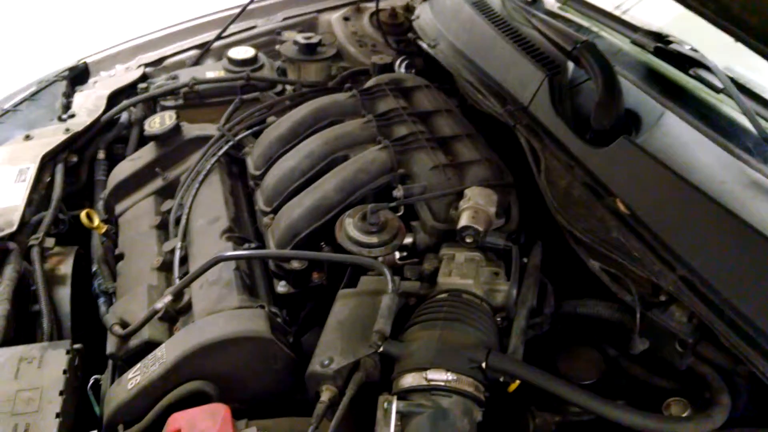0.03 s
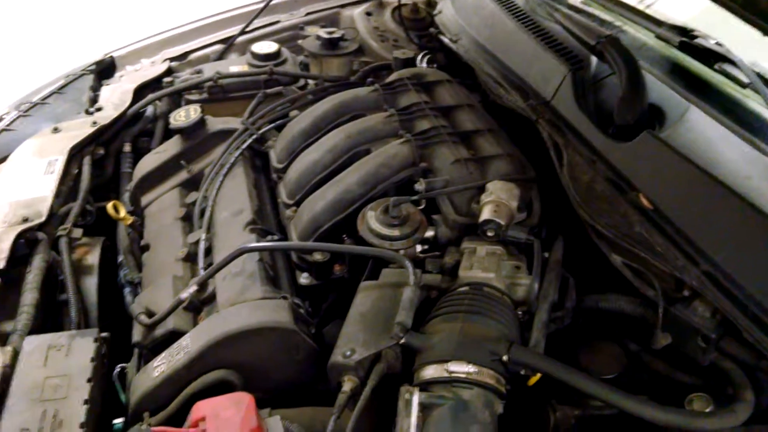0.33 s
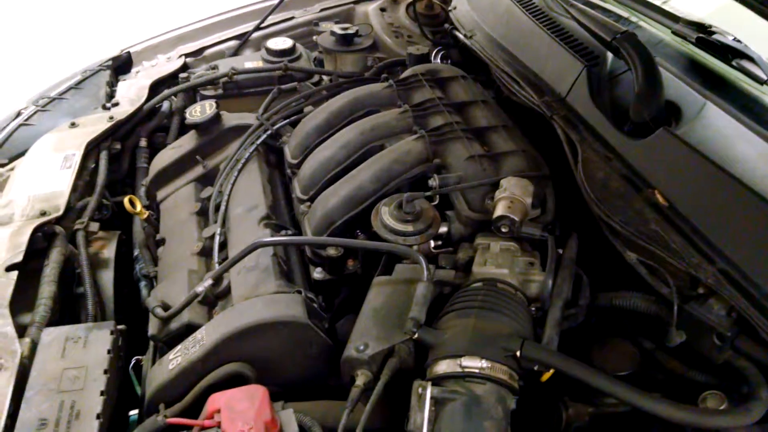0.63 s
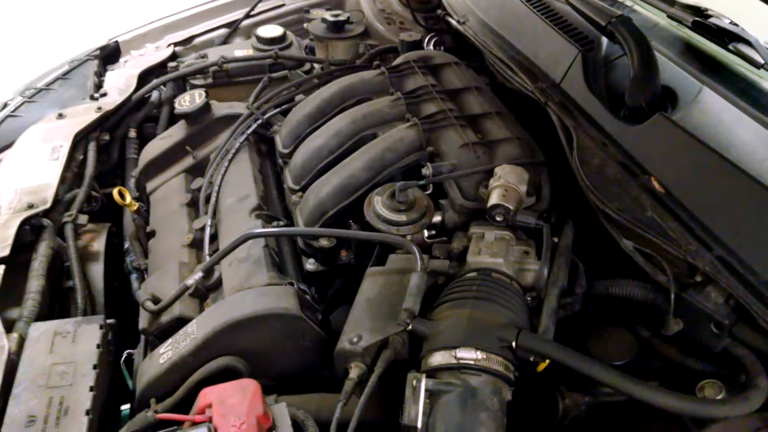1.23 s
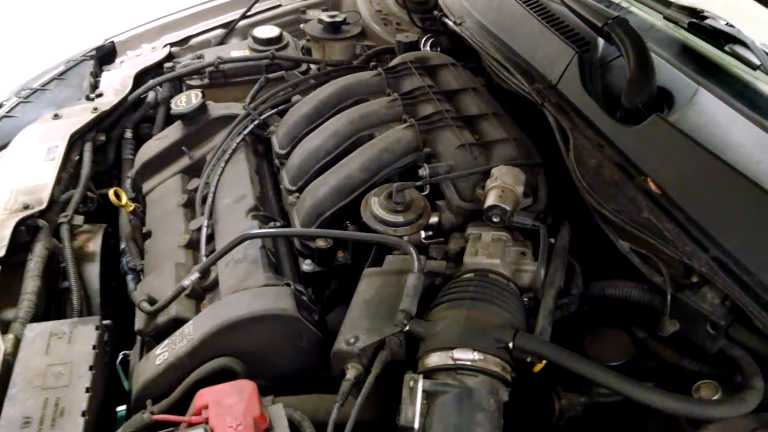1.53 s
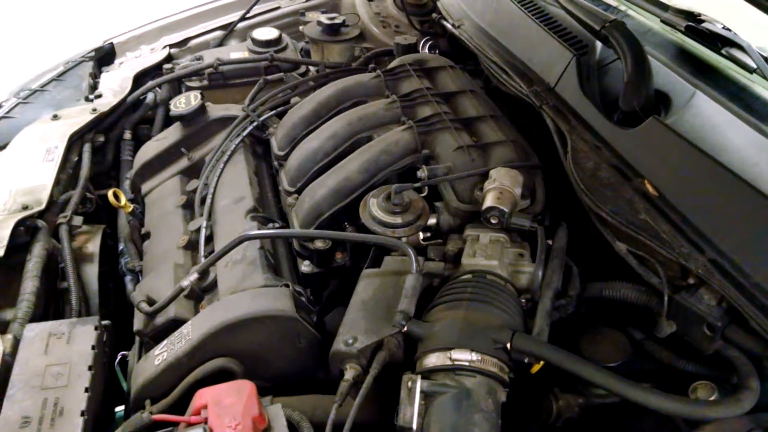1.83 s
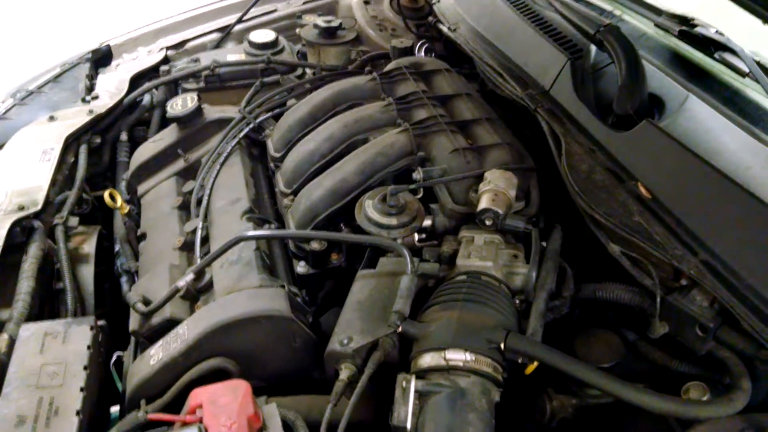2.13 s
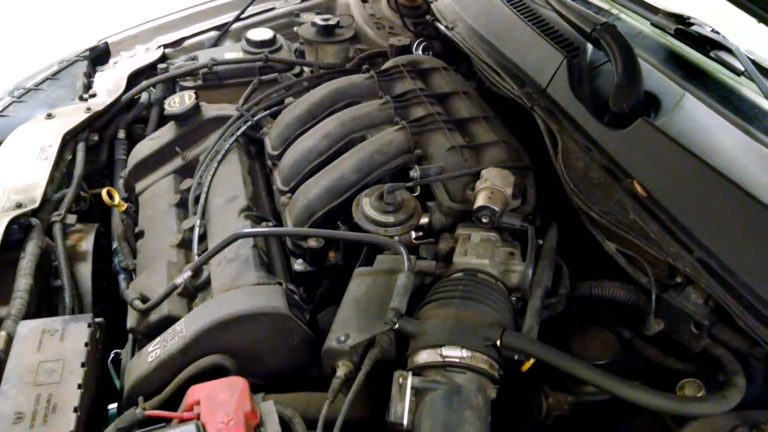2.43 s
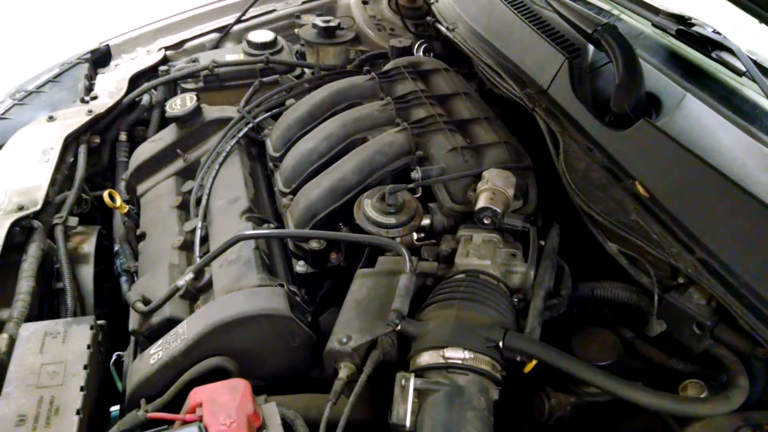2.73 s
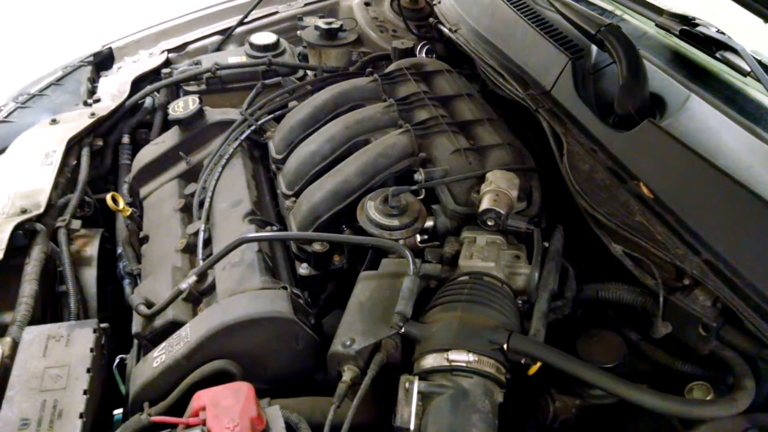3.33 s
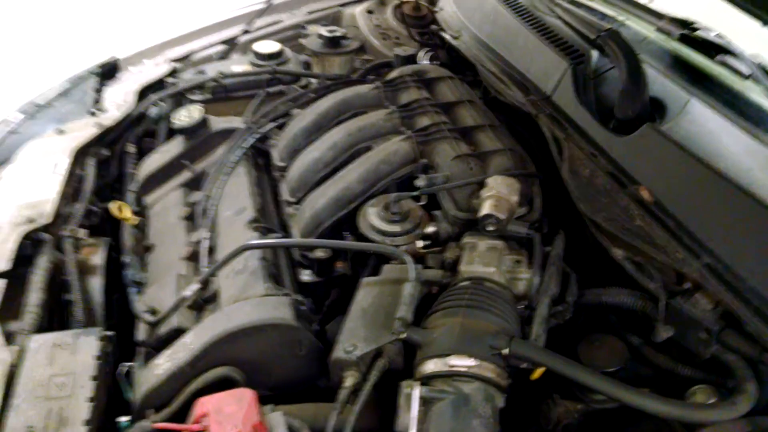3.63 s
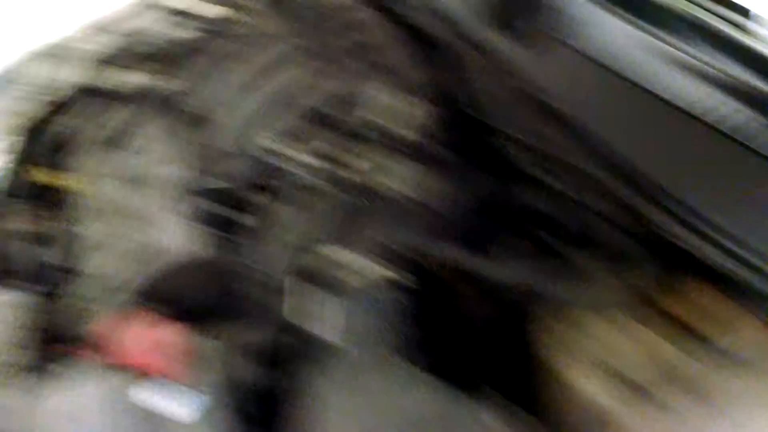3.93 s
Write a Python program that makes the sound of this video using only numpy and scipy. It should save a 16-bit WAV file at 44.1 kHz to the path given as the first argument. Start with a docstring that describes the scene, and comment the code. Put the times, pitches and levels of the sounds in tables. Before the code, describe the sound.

A petrol car engine idles close up for all four seconds, with a steady hum, light tapping, churn and hiss. Sharp, spitting clacks cut through up to ten times a second, alternating with duller rattling knocks that ring briefly in the open bay. Some knocks carry a short squawk, strongest near 0.9 seconds. Hard clacks thump the microphone, mainly around 0.7 and 1.8 seconds.

```python
"""Close above an open engine bay, a six-cylinder petrol engine idles.
The bed is the hum of the firing orders, the tapping and churn of the moving parts and a steady hiss.
On most turns of the crank a sharp, spitting clack cuts through; half a turn later comes a duller,
rattling knock, at times with a squawk. Both ring in the bay, and some hard clacks thump the microphone."""
import sys
import numpy as np
from scipy import signal
from scipy.fft import rfft, irfft
from scipy.io import wavfile

SR = 44100
rng = np.random.default_rng(int(sys.argv[2]) if len(sys.argv) > 2 else 0)


def put_to_file(sound):
    """Save the sound as 16-bit audio at rate SR, in the file named by the first command-line argument."""
    columns = np.atleast_2d(sound).T  # one column per channel
    safe = np.clip(columns, -1, 1)
    whole_steps = np.round(safe * 32767)
    wavfile.write(sys.argv[1], SR, whole_steps.astype(np.int16))


N = 176400

# idle speed: (time [s], crank speed [turns/min])
CRANK_SPEED = [(0, 622), (.5, 625), (.9, 606), (1.4, 644), (1.9, 662), (2.7, 646), (3.5, 623), (4, 630)]
# faders of the two lowest hum tones: (time [s], sixth order [dB], twelfth order [dB])
LOW_HUM_FADERS = [(0, -48, -63), (.7, -54, -63), (1.4, -55, -61), (1.55, -55, -55), (1.75, -66, -53.5),
                  (2.3, -66, -56), (2.7, -60, -56), (3.4, -54, -58), (4, -53, -58)]
# upper hum tones: (order [multiple of the crank rate], level [dB])
UPPER_HUM = [(17, -61), (24, -63.5), (31, -53.5)]
# resonances of the block and the bay: (frequency [Hz], relative level [dB], t60 [s])
BAY_MODES = [(343.3, -14.5, 0.11), (452.5, -12, 0.2), (654.2, -9.5, 0.14), (725.5, -8, 0.19),
             (797, 2, 0.056), (881.5, 3, 0.11), (958, 7, 0.035), (1094, 2, 0.071), (1190, -10, 0.16),
             (1281, 2, 0.069), (1337, 0, 0.077), (1468, -7, 0.2), (1577, -8, 0.15), (1654, -4, 0.06)]
# colour of the machinery's noise bed: (frequency [Hz], relative level [dB])
BED_EQ = [(25, -22), (60, -38), (110, -9), (180, -12.5), (400, 2), (560, -0.5), (900, -0.5), (2000, -1),
          (2800, -5), (4000, -3.5), (5200, -8), (8000, -7.5), (15000, -19.5)]
# colour of the airy hiss: (frequency [Hz], relative level [dB])
HISS_EQ = [(3000, -6.5), (5200, -10), (6500, -2), (10000, -0.5), (12200, 6.5), (13000, 8), (14500, 9.5),
           (15500, -10)]
# stereo width of the noise: (frequency [Hz], left-right likeness [ratio, limited to -1..1 in use])
STEREO_LIKENESS = [(40, -1.1), (130, 0.87), (300, 0.46), (700, 0.53), (1700, 1), (2200, -0.55),
                   (2650, -1.256), (3400, 0.91), (4200, 0.65), (5100, -1.094), (6400, 1), (7800, -0.69),
                   (9200, 0.83), (10300, -0.93), (11600, 0.94), (13000, -0.95), (14300, 0.56)]

# cues for the sharp clacks: (time [s], crack level [dB], body level [dB])
CLACK_CUES = [(-0.012, -7, -13), (0.18, -6, -18), (0.3721, -9.5, -17), (0.4685, -7, -17.5),
              (0.6614, -7.5, -18), (0.761, -9.5, -22), (0.96, -6.5, -20), (1.0585, -7.5, -20.5),
              (1.2498, -7.5, -15.5), (1.4358, -8, -18), (1.529, -12, -16.5), (1.6194, -7, -22),
              (1.8001, -5.5, -23), (1.982, -13.5, -20), (2.1639, -4.5, -16.5), (2.2552, -8.5, -20),
              (2.3467, -8, -15.5), (2.529, -5.5, -20.5), (2.621, -13.5, -17.5), (2.9002, -7.5, -20),
              (2.995, -11, -18.5), (3.0884, -8, -20), (3.1832, -9.5, -18.5), (3.2774, -8, -15.5),
              (3.374, -13.5, -22), (3.47, -5.5, -18.5), (3.5657, -10, -19), (3.6629, -10, -23.5),
              (3.756, -7.5, -18), (3.8531, -8.5, -18.5), (3.9488, -12, -21)]
# colour of the clack's bright front edge: (frequency [Hz], relative level [dB])
CRACK_EQ = [(150, -12), (900, -11.5), (2000, -7), (3200, -13.5), (4300, -1), (5200, -9.5), (7000, 1.5),
            (11000, 3.5), (13000, 4.5), (15000, 1.5)]
# colour of its scatter in the bay: (frequency [Hz], relative level [dB])
TAIL_EQ = [(300, -4.5), (1000, 12.5), (2600, 9.5), (4000, 7), (5200, 12.5), (6500, 10.5), (9000, 10.5),
           (12000, 10.5), (15000, 9)]
# thin metal that the clacks set ringing: (frequency [Hz], relative level [dB], t60 [s])
METAL_MODES = [(2546, -14.5, 0.044), (4270, -20, .06), (6250, -1.5, 0.046), (6530, 1, .04),
               (7300, -10, 0.031), (8070, -1, 0.067), (11200, 4, 0.041), (13900, -17, 0.026)]
# colour of a blow's direct sound: (frequency [Hz], relative level [dB])
THUD_EQ = [(300, -18), (600, -16.5), (850, -1), (1300, 4.5), (1900, -3), (2500, 1), (3900, -13.5),
           (5000, -28), (15000, -36)]

# cues for the dull knocks: (time [s], body level [dB], clank level [dB])
KNOCK_CUES = [(0.044, -24, -25.5), (0.129, -22.5, -15.5), (0.229, -26.5, -26), (0.322, -25.5, -22),
              (0.417, -24, -21.7), (0.515, -25.5, -34), (0.6205, -28, -32), (0.7105, -26.5, -28),
              (0.815, -29, -30), (0.9075, -27, -17.5), (1.0075, -25, -27.5), (1.1065, -28.1, -33),
              (1.2075, -36, -29), (1.295, -26, -35), (1.387, -18.5, -16), (1.482, -23.5, -24),
              (1.576, -25.5, -29), (1.664, -22, -20), (1.7545, -22, -22.5), (1.8445, -25, -33),
              (1.9475, -34, -48), (2.0265, -23, -24), (2.117, -20.5, -16), (2.21, -27, -27.5),
              (2.3135, -31, -34), (2.3935, -22.5, -22), (2.481, -20.5, -20.5), (2.5735, -26.4, -32),
              (2.667, -23.5, -31), (2.759, -25.9, -41), (2.8515, -18, -16), (2.946, -28, -29.0),
              (3.0555, -29.3, -45), (3.1345, -24.5, -27), (3.222, -31.7, -49), (3.324, -23.6, -25),
              (3.4195, -26.5, -26.1), (3.5155, -38, -44.4), (3.6135, -28.5, -28.9), (3.708, -21, -23.5),
              (3.804, -25.5, -29), (3.908, -31.5, -39)]
# ring of the knocking part: (frequency [Hz], relative level [dB], t60 [s])
CLANK_MODES = [(1693, -5, 0.044), (1829, 2.5, 0.062), (1906, -7, 0.035), (1907, 1.5, 0.05),
               (1994, 0, 0.068), (2110, -12, 0.024), (2620, -12, 0.038), (3687, -4, 0.032),
               (4040, -10.5, 0.018), (4080, -22, 0.02)]
# colour of the grit on the clank: (frequency [Hz], relative level [dB])
RASP_EQ = [(300, -38), (800, 6), (2000, 15.5), (2700, 11.5), (3300, 3), (3900, 8), (5200, -3), (8000, -2.5),
           (15000, -6.5)]
# cues for the squawks on some knocks: (time [s], level [dB], pitch [Hz])
SQUAWK_CUES = [(.136, -17.5, 1950), (0.226, -22.5, 2240), (.327, -17, 1973), (.615, -23.5, 2500),
               (0.915, -11, 1897), (1.575, -23.5, 2260), (1.664, -15.5, 1950), (1.757, -19.5, 1820),
               (2.03, -21.5, 2020), (2.122, -16.5, 1806), (2.482, -20, 1810), (2.857, -19, 1820)]
# cues for the microphone thumps and handling rumble: (time [s], level [dB])
THUMP_CUES = [(0.182, -30), (0.4697, -19), (0.6638, -5.5), (1.589, -16), (1.605, -19), (1.62, -20),
              (1.636, -18), (1.7989, -7), (2.166, -20), (2.349, -36), (3.468, -31)]

FIRINGS_PER_TURN, TAPS_PER_TURN, RATTLE_PER_S = 3, 6, 2500
THUD_ATTACK_S, THUD_HOLD_S = 0.00086, 0.0025


def from_db(db):
    """Decibels to gain."""
    return 10 ** (np.asarray(db) / 20)


def rms_one(x):
    """Scale to rms 1."""
    return x / np.sqrt(np.mean(x ** 2) + 1e-20)


def at_hz(points, hz):
    """Read a curve on a log-frequency axis."""
    f, value = np.transpose(points)
    return np.interp(np.log(hz + 1), np.log(f), value)


def drift(per_s):
    """Random modulation with a spread of about 1, gliding to per_s new values a second."""
    return np.interp(np.arange(N) / SR * per_s, np.arange(N // 20), rng.standard_normal(N // 20))


def noise(eq, ripple_step_hz=68.3):
    """Coloured noise, rippled by reflections, its stereo width varying with frequency; rms 1."""
    hz = np.arange(N // 2 + 1) * SR / N
    ripple = np.array([np.interp(hz / ripple_step_hz, np.arange(len(row)), row)
                       for row in rng.standard_normal((2, N // 100))])
    ripple_db = 3 * ripple * hz / (hz + 2000)
    mid, side = rfft(rng.standard_normal((2, N))) * from_db(at_hz(eq, hz) + ripple_db)
    alike = np.clip(at_hz(STEREO_LIKENESS, hz), -1, 1)
    return rms_one(irfft(np.sqrt(1 + alike) * mid + np.sqrt(1 - alike) * side * [[1], [-1]], N))


def bursts(times, levels_db, attack_s, hold_s, fall_s):
    """An envelope with one attack, hold and exponential fall for each cue."""
    out, t = np.zeros(N + 2 * SR), np.arange(SR // 4) / SR
    shape = np.minimum(t / attack_s, 1) * np.exp(-np.maximum(t - attack_s - hold_s, 0) / fall_s)
    for s, db in zip(times, levels_db):
        i = SR + int(s * SR)
        out[i:i + len(t)] += from_db(db) * shape
    return out[SR:SR + N]


def blows(times, levels_db, energy_s=0.013):
    """One hard contact for each cue: an impulse with the energy of a sound energy_s long."""
    out = np.zeros(N + 2 * SR)
    out[SR + (times * SR).astype(int)] = from_db(levels_db) * np.sqrt(energy_s * SR)
    return out[SR:SR + N]


def rattle(width=0.35):
    """Dense random contacts, spread in stereo; rms 1."""
    mid, side = (rng.random((2, N)) < RATTLE_PER_S / SR) * rng.choice([-1, 1], (2, N))
    return rms_one(mid + width * side * np.array([[1], [-1]]))


def ring(force, modes, scatter_db=2):
    """Drive resonances, each a little differently from hit to hit; white noise keeps about its level."""
    out, power = 0, 0
    for k, (hz, db, t60) in enumerate(modes):
        r, w = np.exp(-np.log(1000) / (t60 * SR)), 2 * np.pi * hz / SR
        drive = force * from_db(scatter_db * drift(10))
        mode = signal.lfilter([1, -r * np.cos(w)], [1, -2 * r * np.cos(w), r * r], drive + 1e-18)
        out = out + (-1) ** k * from_db(db) * mode
        power += from_db(db) ** 2 / (2 * (1 - r * r))
    return out / np.sqrt(power)


def in_bay(force, pan_db=1.6):
    """The block and the bay ring, a little to the left."""
    return ring(force, BAY_MODES) * from_db([[pan_db], [-pan_db]])


def hum(turns):
    """Wavering tones at multiples of the crank rate; midway the lowest gives way to its octave."""
    def tone(order, db, lead_rad):
        phase = 2 * np.pi * order * turns + 0.27 * drift(3.7) + np.array([[0], [lead_rad]])
        return np.sqrt(2) * from_db(db + 1.5 * drift(4.16)) * np.sin(phase)
    times, *faders = np.transpose(LOW_HUM_FADERS)
    low_db, octave_db = (np.interp(np.arange(N) / SR, times, db) for db in faders)
    low = tone(6, low_db, lead_rad=2.13) * from_db([[-3.5], [3.5]])   # panned right
    octave = tone(12, octave_db, lead_rad=0.43)
    return low + octave + sum(tone(order, db, lead_rad=0.98) for order, db in UPPER_HUM)


def valve_taps(turns, jitter_s=0.00098, scatter_db=3):
    """The valve gear taps lightly and unevenly, in step with the crank."""
    times = np.flatnonzero(np.diff(np.floor(turns * TAPS_PER_TURN))) / SR
    timing, strength = rng.standard_normal((len(times), 2)).T
    return in_bay(blows(times + jitter_s * timing, -42.5 + scatter_db * strength))


def churn(turns, chatter_db=2.5):
    """Moving parts rattle over a noise bed; both throb with the firings and flutter at random."""
    firing = 2 * np.pi * FIRINGS_PER_TURN * turns
    throb = 1 + 0.079 * (.5 * np.cos(firing) + np.cos(2 * firing))
    throb *= from_db(chatter_db * drift(110))
    return from_db(-39.5) * in_bay(throb * rattle()) + from_db(-32.5) * throb * noise(BED_EQ)


def hiss():
    """Air hisses on top with a faint flicker."""
    return from_db(-33 + 0.63 * drift(27)) * noise(HISS_EQ)


def clacks(attack_s=0.00088, hold_s=0.0021, direct_share=0.14, ear_lag_s=0.00022):
    """A spit of a few milliseconds, its scatter in the bay, and the metal and block ringing after it."""
    times, crack_db, body_db = np.transpose(CLACK_CUES)
    spit = bursts(times, crack_db, attack_s, hold_s, fall_s=0.0026)
    source = noise(CRACK_EQ)[0]
    direct = np.array([source, np.roll(source, int(ear_lag_s * SR))])   # the right ear is farther
    crack = spit * (np.sqrt(direct_share) * direct + np.sqrt(1 - direct_share) * noise(CRACK_EQ))
    tail = bursts(times, crack_db - 12, attack_s=0.0037, hold_s=0.01, fall_s=0.023) * noise(TAIL_EQ)
    metal = from_db(-14) * ring(spit * rng.standard_normal((2, N)), METAL_MODES)
    push = bursts(times, body_db - 10, attack_s, hold_s, fall_s=0.0016)
    body = in_bay(blows(times, body_db - 7) + 2 * push * rattle())
    return crack + tail + metal + thuds(times, body_db - 8) + body


def thuds(times, levels_db):
    """The direct sound of a blow: a short, dull puff of midrange noise."""
    return bursts(times, levels_db, THUD_ATTACK_S, THUD_HOLD_S, fall_s=0.0023) * noise(THUD_EQ)


def knocks(bounce_lag_s=0.0049, landing_lag_s=0.011):
    """A hard blow thuds and rings the block; the loose part bounces, swells into a clank and lands."""
    times, body_db, clank_db = np.transpose(KNOCK_CUES)
    bounces = bursts(times + bounce_lag_s, body_db - 3.5, THUD_ATTACK_S, THUD_HOLD_S, fall_s=0.023)
    body = in_bay(blows(times, body_db - 3) + bounces * rattle())
    swell = bursts(times, clank_db, attack_s=0.009, hold_s=0.005, fall_s=0.014)
    landing = blows(times + landing_lag_s, clank_db - 6)
    clank = from_db(-2) * ring(swell * rattle(width=1) + landing, CLANK_MODES)
    rasp = from_db(-3) * swell * noise(RASP_EQ)
    return thuds(times, body_db + 1) + body + clank + rasp


def squawks(attack_s=0.008, hold_s=0.003, scoop_depth=0.2, scoop_s=0.006, ear_lag_s=0.0001):
    """A rough tone with its octave scoops up, breaks off and lingers faintly in the bay."""
    times, db, hz = np.transpose(SQUAWK_CUES)
    t = np.arange(N) / SR
    latest = np.maximum(np.searchsorted(times, t) - 1, 0)
    pitch = hz[latest] * (1 - scoop_depth * np.exp(-abs(t - times[latest]) / scoop_s))
    wobble = 1 + 0.04 * drift(400)
    phase = 2 * np.pi * (np.cumsum(pitch * wobble) / SR - pitch * np.array([[0], [ear_lag_s]]))
    direct = bursts(times, db, attack_s, hold_s, fall_s=0.0035)
    echo = bursts(times + attack_s, db - 8, attack_s, hold_s, fall_s=0.037)
    roughness = from_db(2.5 * drift(400))
    return np.hypot(direct, echo) * roughness * (np.sin(phase) + from_db(-10) * np.sin(2 * phase))


def mic_thumps(length_s=0.0049):
    """Low microphone thumps on hard clacks and a brief handling rumble, left and right in antiphase."""
    out, pulse = np.zeros(N), np.hanning(int(length_s * SR))
    for s, db in THUMP_CUES:
        i = int(s * SR)
        out[i:i + len(pulse)] += from_db(db - 4.5) * pulse
    return out * np.array([[-.7], [1]])


def scene():
    """The mix: the idling engine as a bed, with the cued hits on top."""
    rpm = np.interp(np.arange(N) / SR, *np.transpose(CRANK_SPEED))
    turns = np.cumsum(rpm) / 60 / SR
    idle = hum(turns) + valve_taps(turns) + churn(turns) + hiss()
    return idle + clacks() + knocks() + squawks() + mic_thumps()


def record(dry):
    """The loudest peaks clip, then a steep low-pass takes off the very top."""
    lowpass = signal.ellip(10, .2, 70, 15500, fs=SR, output="sos")
    return signal.sosfilt(lowpass, np.clip(dry, -.95, .95))


dry = scene()
out = record(dry)
put_to_file(out)
```